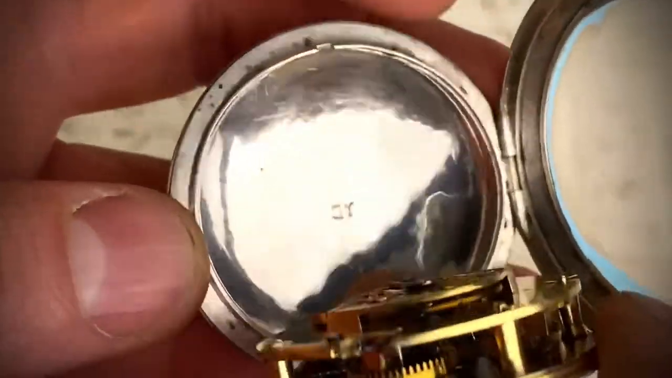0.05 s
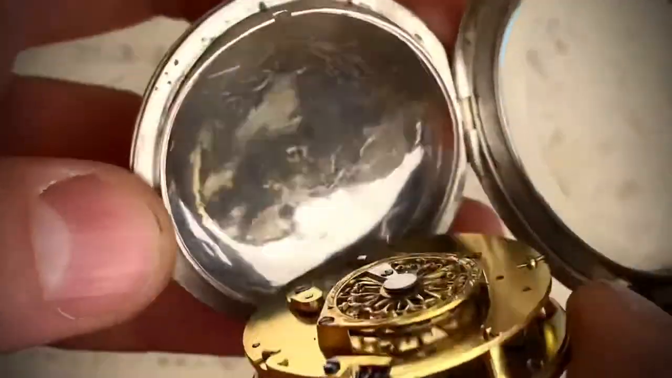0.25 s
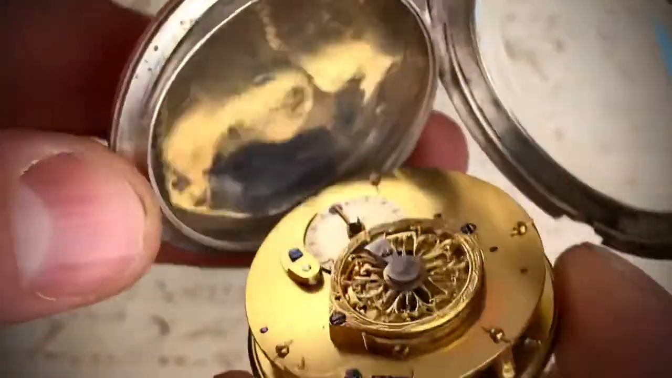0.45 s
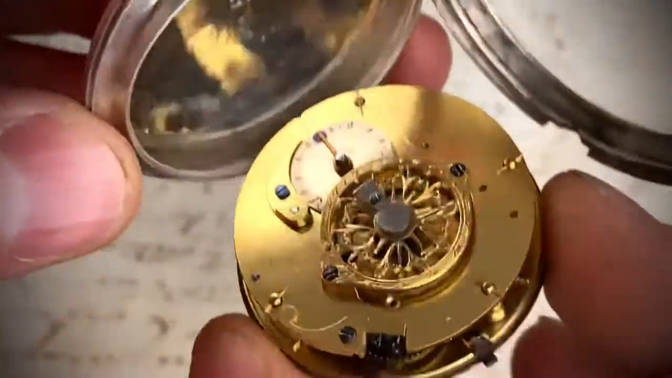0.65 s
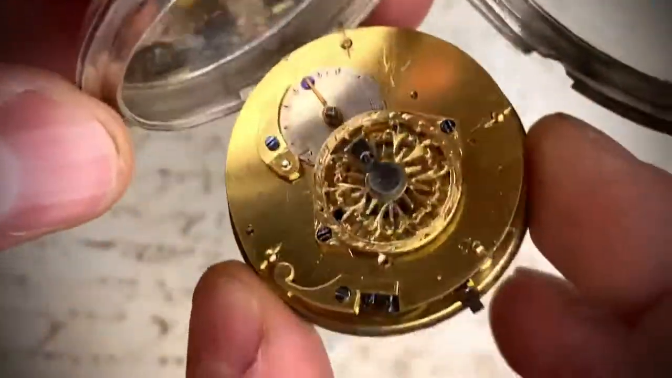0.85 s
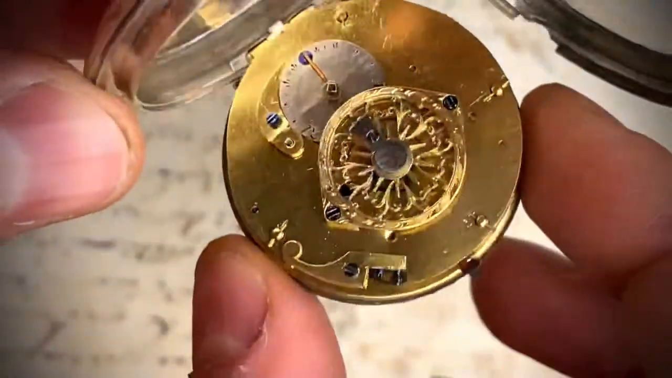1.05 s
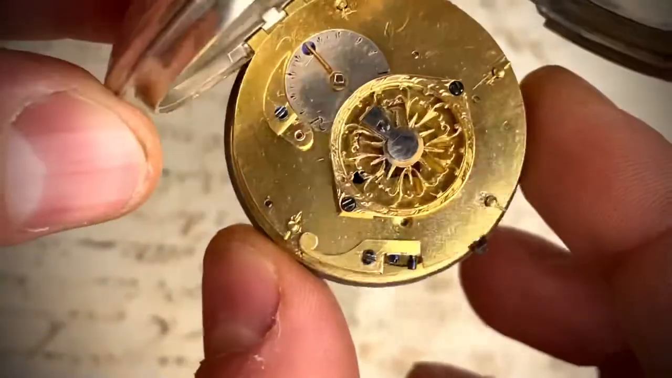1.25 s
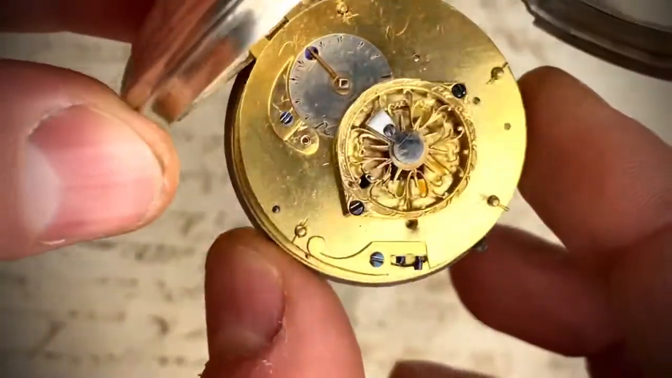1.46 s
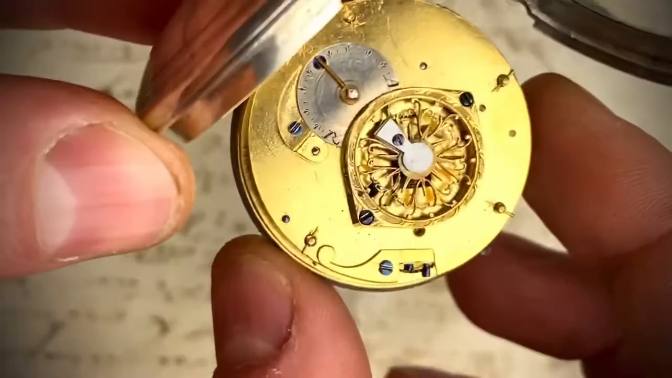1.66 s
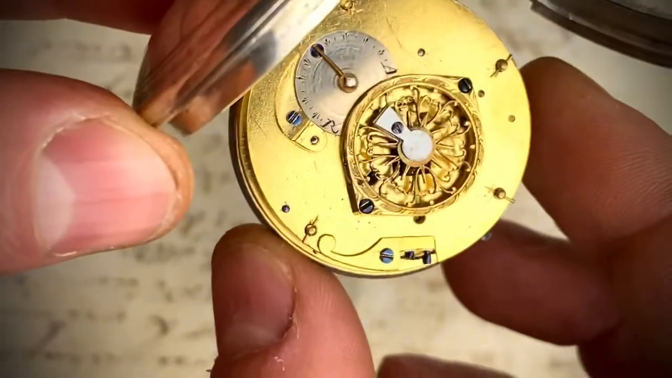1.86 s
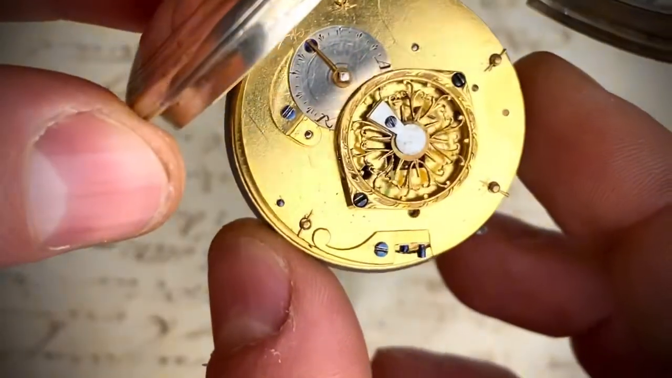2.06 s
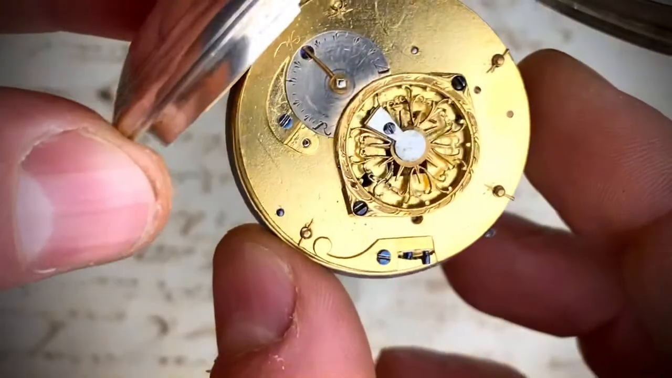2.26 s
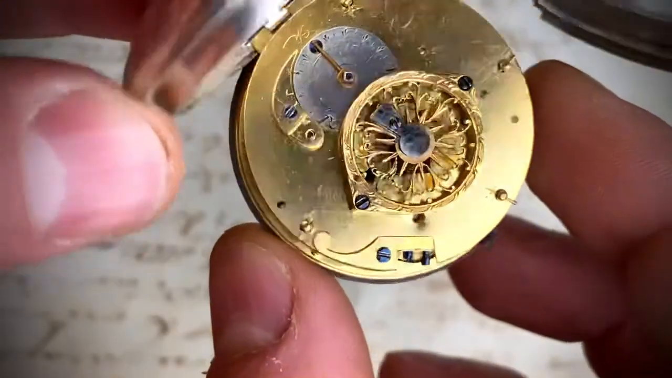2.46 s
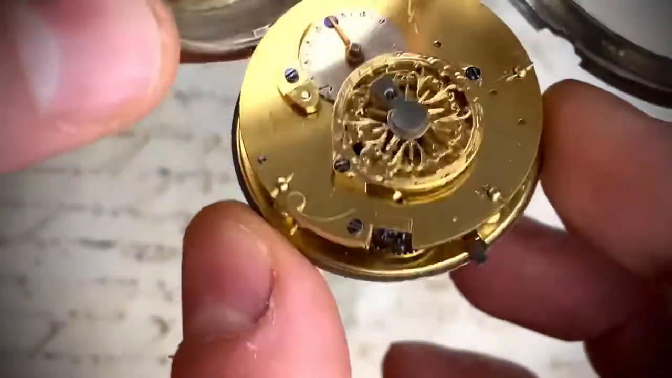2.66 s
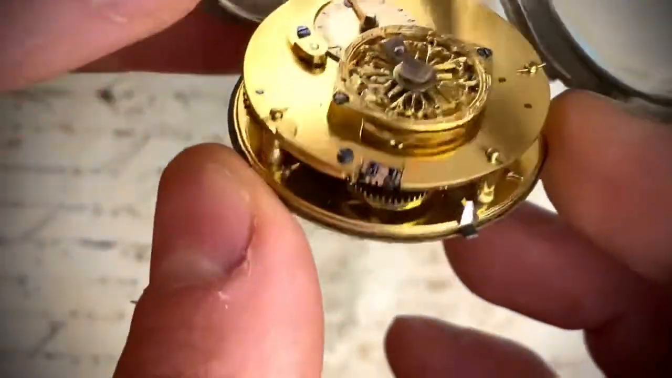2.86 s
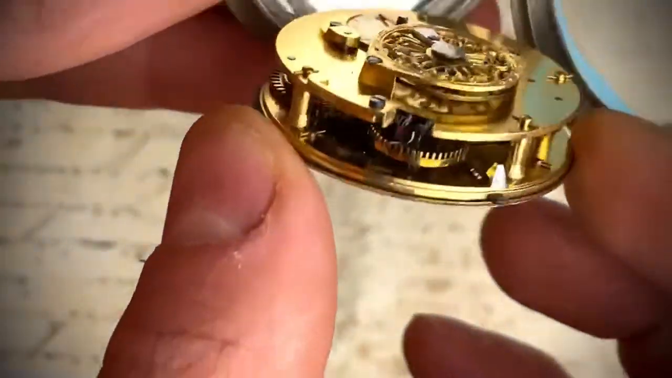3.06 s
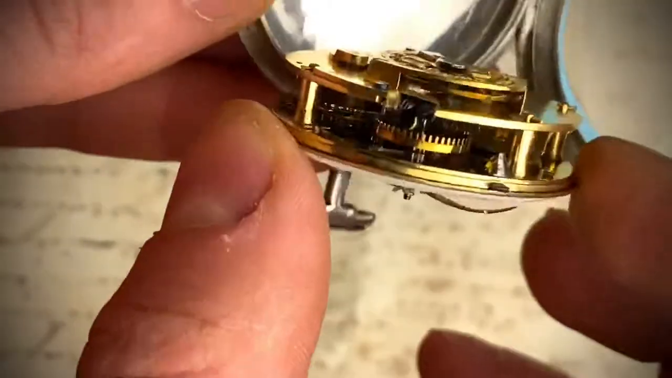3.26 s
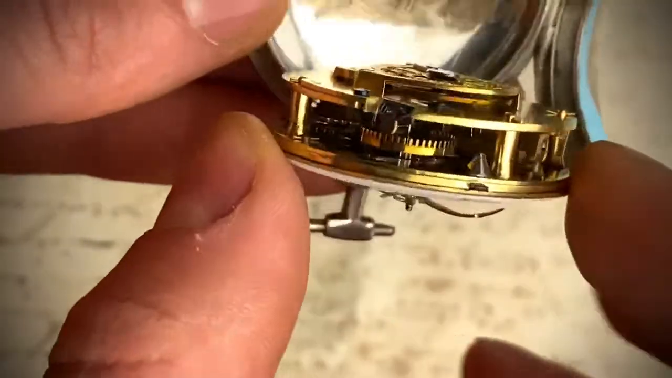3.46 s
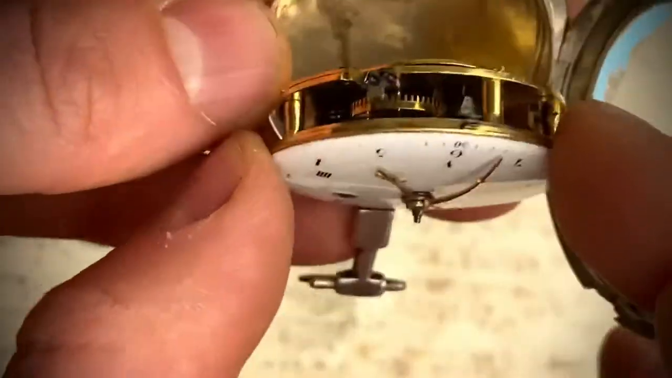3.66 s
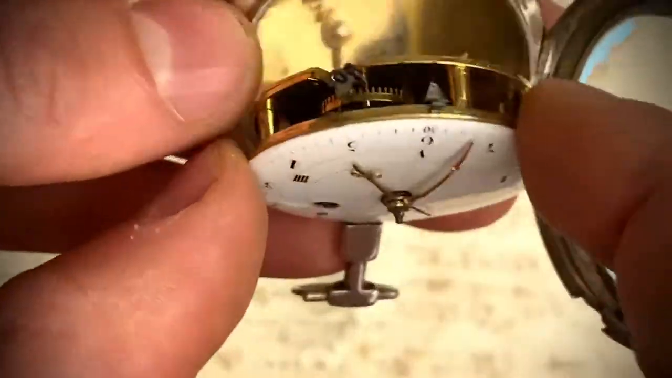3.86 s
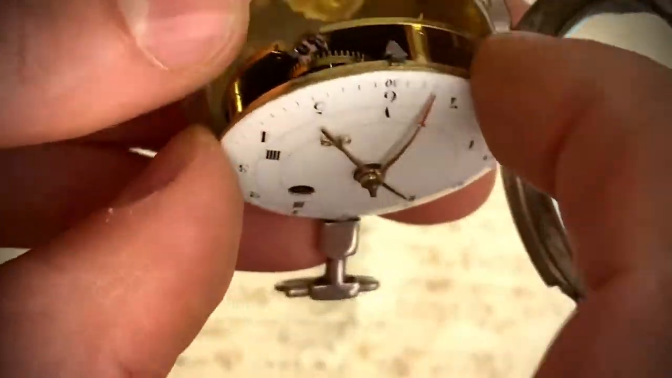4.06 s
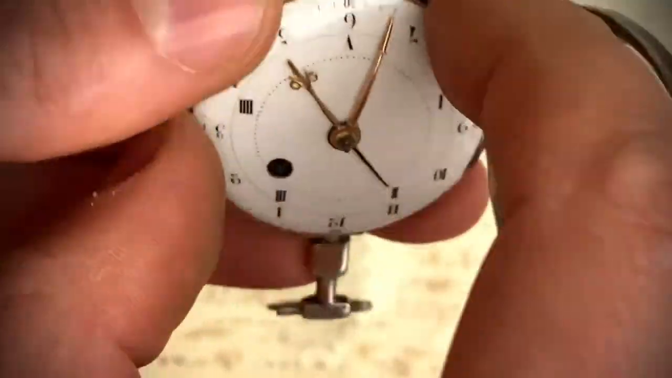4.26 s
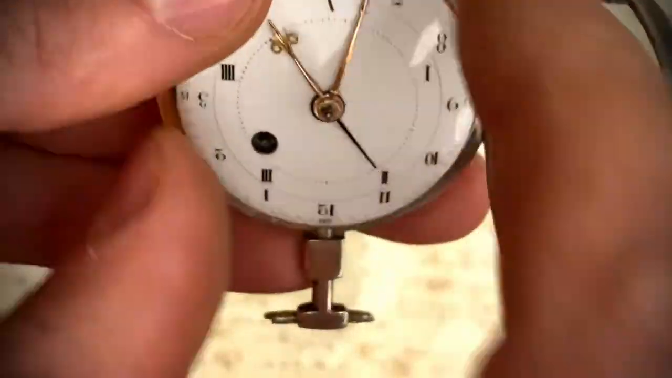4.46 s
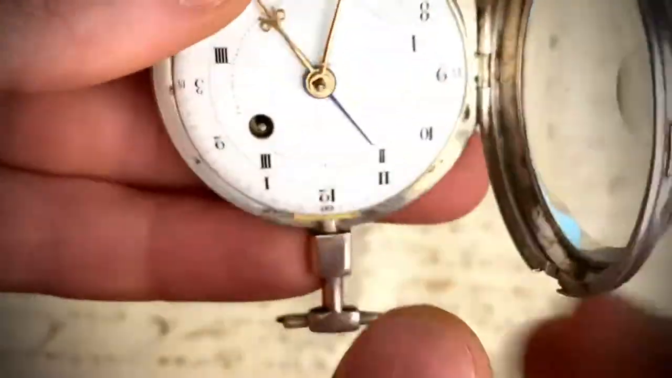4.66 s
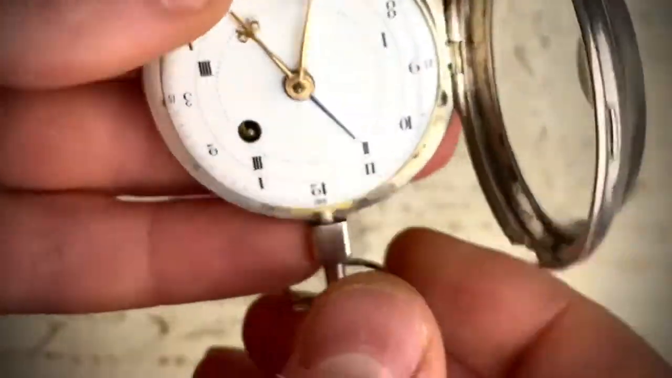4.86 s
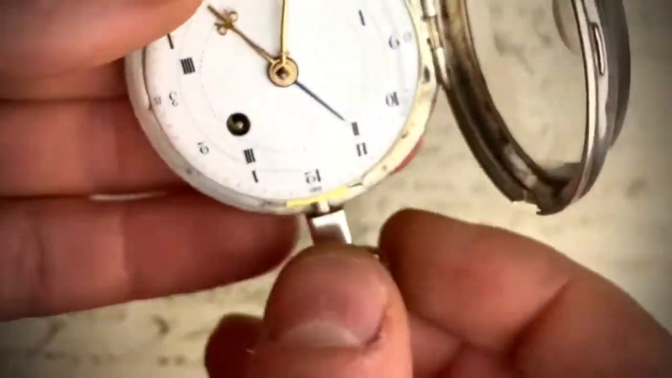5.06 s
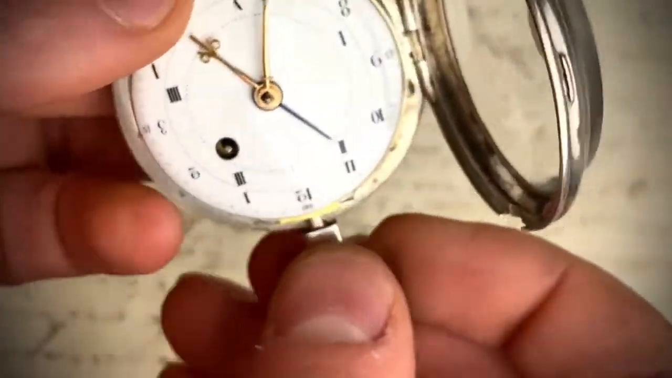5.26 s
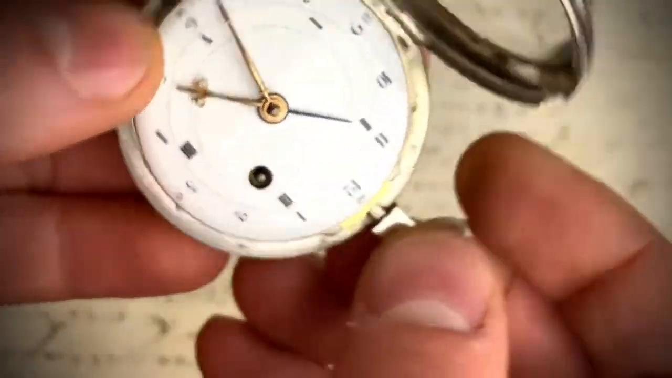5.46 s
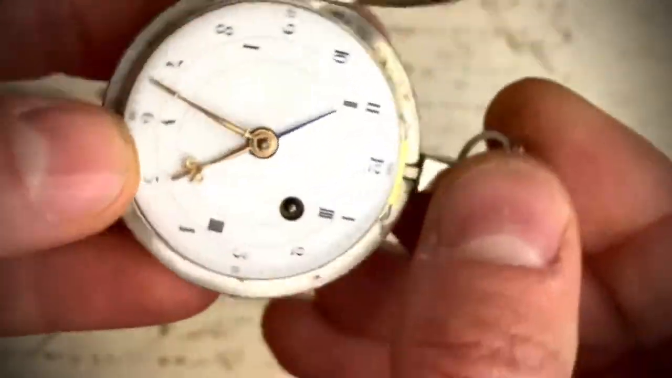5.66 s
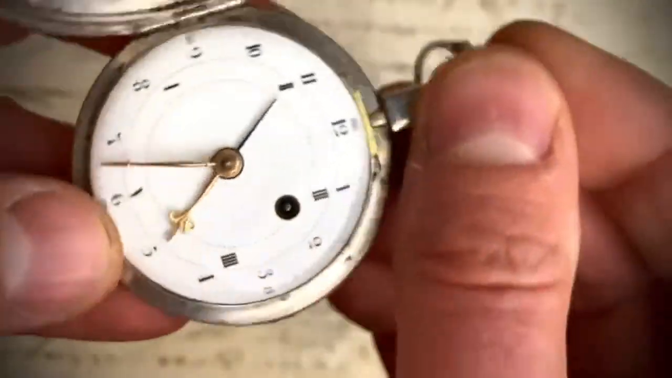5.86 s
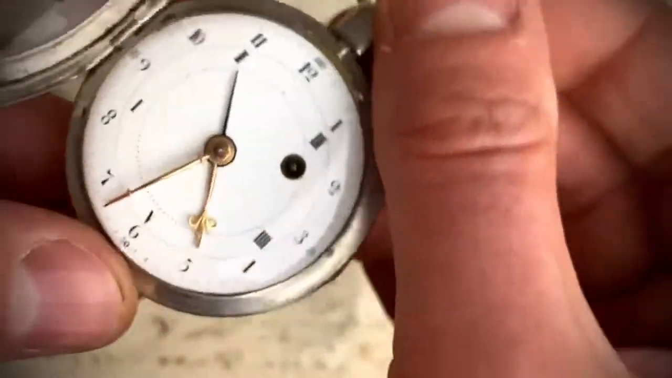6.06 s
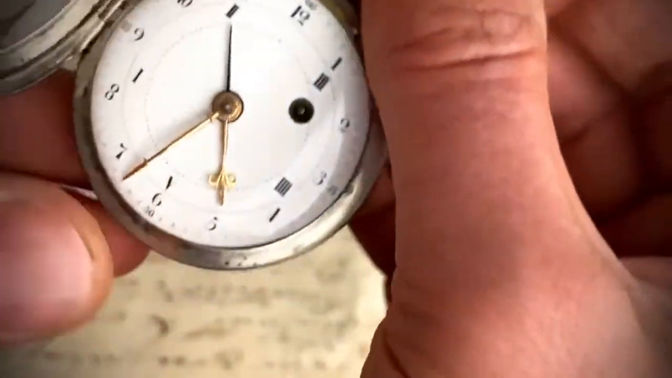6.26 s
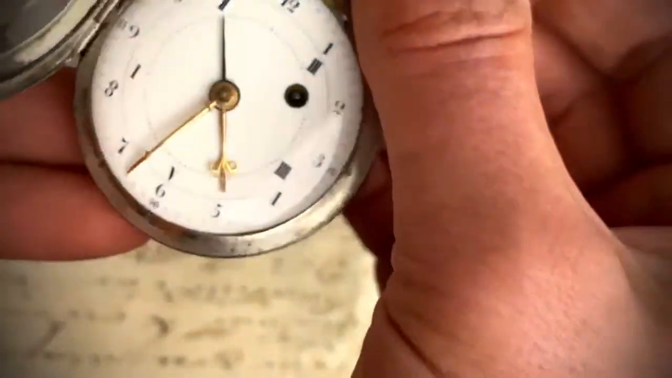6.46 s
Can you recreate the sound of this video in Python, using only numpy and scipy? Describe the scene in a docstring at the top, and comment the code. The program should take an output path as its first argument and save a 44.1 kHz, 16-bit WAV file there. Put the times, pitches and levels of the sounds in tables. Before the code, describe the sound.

Quick, even ticking from an open pocket watch held near the microphone, thin and bright. After about four seconds the works are swung into the metal case with several sharp knocks, followed by one bright snap, while fingertips slide faintly over it. The watch keeps ticking to the end. Behind it is a quiet room with soft hiss, slight electrical hum and the barely audible echo of two far clocks.

```python
"""An open pocket watch ticks in two hands, close to the microphone in a quiet room. Each beat is a short
chatter of steel on the brass plates. It starts back plate up and is tipped edge on at 2.7 s; near 4.2 s
it is swung into its silver case, which knocks and clanks and is snapped home just after 5 s, fingers
sliding on the metal. All along, two more clocks tick far off, heard only as room echo, over a wavering
mains hum and a soft hiss."""
import sys
import numpy as np
from scipy import signal
from scipy.fft import rfft, irfft, next_fast_len
from scipy.io import wavfile
from scipy.ndimage import map_coordinates

SR = 44100
rng = np.random.default_rng(int(sys.argv[2]) if len(sys.argv) > 2 else 0)


def unload_wav(signal):
    """Save mono or channel-first audio to the path in sys.argv[1] as 16-bit WAV at rate SR, clipped to [-1, 1]."""
    wavfile.write(
        sys.argv[1],
        SR,
        np.round(np.clip(np.atleast_2d(signal).T, -1, 1) * 32767).astype(np.int16),
    )


N = 287517

# beats, tick and tock in turn: (time [s], energy [dB], 3.7 kHz ping [dB], treble [dB], chatter [ms])
BEATS = [(0.1181, -17, 2, -1, 1.9), (0.3257, -20, -5.5, 6.5, 1.54), (0.5287, -18, 5.5, 2.5, 3.7),
         (0.7307, -22.5, 3, -2, 1.3), (0.9393, -14, 2, -0.5, 4.1), (1.1473, -18.2, 1, 1, 1.005),
         (1.3533, -13.5, 2, -1.5, 0.48), (1.5554, -21, -5.5, -1.5, 1.77), (1.7624, -13.5, 3.5, -0.5, 4.2),
         (1.9754, -18, -1.5, 4.5, 1.0), (2.1799, -17, -0.5, -2.5, 0.79), (2.391, -20, -1.5, -3.5, 1.9),
         (2.6015, -16, 5, 2, 2.7), (2.814, -19, 2.5, 4, 1.23), (3.0245, -16.5, -3.5, -2.5, 0.53),
         (3.2331, -18.5, -5.5, -5.5, 0.44), (3.4341, -17.5, 4, 4, 2.0), (3.6436, -19.5, 8, -0.5, 1.84),
         (3.8541, -16.2, 7, 1, 1.0), (4.0607, -18.5, 3.5, -0.5, 0.79), (4.2647, -20, 5.5, -0.3, 2.5),
         (4.4692, -18.5, -10, -6, 1.5), (4.6768, -19, 5, 0, 1.4), (4.8753, -20.5, -3.5, -2, 1.1),
         (5.0814, -20, -2, 6, 1.9), (5.2789, -22, -1, -2, 0.57), (5.4774, -18.6, 1.5, 2, 1.08),
         (5.6775, -22.5, 7.5, 0.5, 1.8), (5.8731, -21, 2.5, 5, 0.7), (6.0551, -23.0, 1, 5, 1.5),
         (6.2547, -17.5, 2.1, -5, 2.38), (6.4497, -21.5, 9.5, -2, 0.82)]
# modes of the brass movement: (frequency [Hz], tick level [dB], tock level [dB], t60 [s])
BRASS_MODES = [(1710, 0, -2.5, 0.0067), (2430, 3, -2.5, 0.013), (3457, 4, 1.5, 0.0088),
               (3730, -21.5, -14.5, 0.078), (4460, -5, -9, 0.0061), (4995, 1, 3.5, .012),
               (5870, -26, -25.5, .09), (5930, 5.5, 0, 0.0092), (7005, -3, -9, 0.0078),
               (8134, 1.5, 4.5, 0.012), (8680, -16, -22.5, 0.067), (9800, -2, -0.5, 0.015),
               (10170, -21.5, -16.5, 0.078), (11300, -10.5, -7, 0.0043), (12500, 6, -2, 0.0071),
               (13100, -22, -14.5, .05), (13700, 1, -1, .012), (14200, -3, -2.5, 0.0077),
               (15300, -3, -1.5, .01)]
# bands in which a beat or knock is coloured: (frequency [Hz])
BANDS_HZ = [2000, 3700, 5000, 6000, 10000, 14000]
# colour at the microphone; rows back plate up, edge on, in the case: (level per band [dB re 8 kHz])
TICK_POSES = [(-25.5, -12.5, -3.5, 3.1, -6, -12), (-19.5, -12.5, -4.5, 5.7, -7.5, -11),
              (-13, -1, -10.5, 9.8, -6.5, -8.5)]
TOCK_POSES = [(-33, 2.5, -0.5, 2.1, -5, -3), (-15, -12.5, -1, 0.84, -7.5, -5.5),
              (-0.5, 2, -2.5, 10, 0.5, -4.5)]
EDGE_ON_S, IN_CASE_S = 2.7, 4.2
# first touch, main blow and rebound of one chatter: (relative strength [gain])
CONTACTS = np.array([.5, 1, .6])
# the case knocked, hinged and shut: (time [s], energy [dB], thud [dB], clank [dB], treble [dB], chatter [ms])
KNOCKS = [(0.6064, -40.5, 11, 0, 8, 3.1), (0.615, -44, -1, -2, 5, 4.2), (4.1583, -2.5, -5, 8, -1.5, 0.98),
          (4.1615, -3.5, 4, 6, 13, 0.41), (4.165, -16.5, 1, 8, 6, 1.3),
          (4.214, -1.5, -10.5, -8.5, 0.1, 1.26), (4.4829, 0, -30, -5, -2, 0.75),
          (4.4866, 9, -21, -14, -3.5, 0.53), (4.4885, 9, -2.5, 8.5, -1.7, 0.8),
          (4.584, -22, -21, 17.5, -3, 1.9), (4.7449, -14.5, -27.5, 9, -1, 1.3),
          (4.7486, -18, -22, 10.5, -1, 2.54), (4.7746, -31, -10, 17, -4, 2.5),
          (4.786, -12, -33.5, -5, 1, 1.38), (4.7938, -13, -24, 17.5, 0, 1.4),
          (5.0676, 1.05, -23, 5, 20, 0.59)]
# modes of the silver case: (frequency [Hz], level [dB], t60 [s])
SILVER_MODES = [(1173, -1.5, 0.014), (880, -5, 0.016), (1750, 3, 0.03), (1822, -1, 0.034),
                (2050, -7.5, 0.023), (2279, -3, 0.008), (2657, -8, 0.012), (3597, -9.5, 0.027),
                (4960, 0.5, .012), (5250, -1, 0.022), (5500, 0.5, 0.019), (6280, -5, .025),
                (7786, -4, 0.024), (8330, -6.5, 0.022), (8830, -8, .035), (9520, -10.5, .025),
                (10430, 0, 0.018), (10900, -6, 0.014), (11850, -3, 0.019), (13040, 2, 0.017),
                (13100, -2.5, 0.014), (14100, -3, 0.02), (14750, -4, .02), (16290, -5.5, .015)]
# colour common to all knocks: (level per band [dB re 8 kHz])
KNOCK_COLOUR = np.array([-1, 1.0, -7.5, -0.5, -0.5, 0.54])
# how much of a knock's clank and treble reaches each band: (share [ratio])
CLANK_SHARE = np.array([0.97, 0.66, 0.84, 0, 0, 0.11])
TREBLE_SHARE = np.array([0, 0.18, 0.011, 0.036, 0.95, .7])
# finger slides: (start [s], length [s], level [dB])
RUBS = [(.245, .015, -79), (3.76, .11, -74), (4.447, 0.04, -62), (4.972, 0.13, -69.5), (5.233, 0.019, -73),
        (5.253, 0.022, -70.5), (5.3, 0.14, -71), (5.58, .1, -76)]
# resonances of skin on metal and of the two far clocks: (frequency [Hz], half-width [Hz], level [dB])
SKIN_PEAKS = [(8400, 1500, -3), (11000, 2800, -5.5), (13800, 1500, 3.5)]
DULL_CLOCK_PEAKS = [(3610, 210, -6), (5100, 160, 2.5), (5350, 400, -5.5), (5800, 220, -2),
                    (7160, 230, -8.5)]
BRIGHT_CLOCK_PEAKS = [(8600, 1000, -10.5), (9710, 1100, 4), (10600, 900, -5.5), (12900, 550, 4),
                      (13600, 1400, -1.5), (15400, 400, -8.5)]
# close scatter off hands, lids and table, then the room's echo: (frequency [Hz], t60 [s])
NEAR_DECAY = [(1000, 0.086), (6000, 0.03), (14000, 0.048)]
ROOM_DECAY = [(300, 0.27), (2000, 0.33), (6000, 0.35), (14000, .22)]
# low mains hum and a thin whine: (frequency [Hz], half-width [Hz], level [dB])
HUM_PEAKS = [(97, 6.6, -76.5), (2210, 90, -86)]
# course of the hum's second partial: (time [s], level [dB])
BUZZ_LEVELS = [(0.0, -78), (1.0, -85.5), (1.3, -73), (2.8, -81), (3.3, -89.5), (6.52, -90.5)]
# hiss of room and microphone: (frequency [Hz], relative density [dB])
HISS_SPECTRUM = [(15, -43), (30, -29), (65, -5), (150, -4.5), (438, -8), (700, -13), (1700, -19),
                 (4500, -22.5), (7000, -25), (14000, -28.5), (15800, -28.5), (16100, -54.5)]
# microphone response: (frequency [Hz], gain [dB])
MIC_RESPONSE = [(40, -3), (70, -1), (15400, 0.5), (16000, -14.5), (16800, -35.5)]


def escapement():
    """The watch, close up: two pallets take turns and ring the same plates at different strengths."""
    tick = [(hz, db, t60) for hz, db, _, t60 in BRASS_MODES]
    tock = [(hz, db, t60) for hz, _, db, t60 in BRASS_MODES]
    pallets = [(BEATS[::2], TICK_POSES, tick), (BEATS[1::2], TOCK_POSES, tock)]
    return sum(struck_metal(posed(beats, poses), modes, BANDS_HZ, low_db=-13, crack_db=12,
                            crack_t60=0.0077, blur=0.084, near_db=-10, room_db=-25)
               for beats, poses, modes in pallets)


def posed(beats, poses):
    """Beats coloured by how the watch faces the microphone; no two leave the hands alike."""
    scatter_db = rng.normal(0, 0.5, (len(beats), len(BANDS_HZ)))
    events = []
    for (s, db, ping, treble, ms), scatter in zip(beats, scatter_db):
        pose = poses[int(s > EDGE_ON_S) + int(s > IN_CASE_S)]
        colour = pose + scatter + [0, ping, 0, 0, treble, treble]
        events.append((s, db, *colour, ms))
    return events


def silver_case(thud_hz=950):
    """The case, just as close: each knock rings the silver with its own thud, clank and treble."""
    events = [(s, db, thud, *(KNOCK_COLOUR + clank * CLANK_SHARE + treble * TREBLE_SHARE), ms)
              for s, db, thud, clank, treble, ms in KNOCKS]
    return struck_metal(events, SILVER_MODES, [thud_hz] + BANDS_HZ, low_db=-28.5, crack_db=13.5,
                        crack_t60=0.0092, blur=0.061, near_db=-13.5, room_db=-18.5)


def struck_metal(events, modes, bands_hz, low_db, crack_db, crack_t60, blur, near_db, room_db):
    """Small impacts ring the modes with a dry crack; near scatter and the room's echo follow."""
    out, t = np.zeros(N + SR), np.arange(SR // 6) / SR
    hz, level_db, t60 = np.transpose(modes)[:, :, None]
    attack = 1 - np.exp(-t / 0.00064)
    for s, db, *band_db, chatter_ms in events:
        colour = sorted([(bands_hz[0] / 2, band_db[0] + low_db), (8000, 0), *zip(bands_hz, band_db)])
        # fingers and loose parts make the phase of every mode wander
        phase = 2 * np.pi * rng.random(hz.shape)
        phase = phase + blur * np.cumsum(rng.standard_normal((len(hz), len(t))), axis=1)
        strength = amp(level_db + along(colour, hz) + rng.normal(0, 1.8, hz.shape))
        life = t60 * (.7 if s > IN_CASE_S else 1)  # the case damps the ringing
        ring = np.sum(strength * amp(-60 * t / life) * np.sin(2 * np.pi * hz * t + phase), axis=0)
        crack = filtered(rng.standard_normal(len(t)), lambda f: amp(crack_db + along(colour, f)))
        crack *= amp(-60 * t / crack_t60)
        blow = signal.fftconvolve((ring + crack) * attack, chatter(chatter_ms))
        blow = amp(db) * blow / np.linalg.norm(blow)
        near = amp(near_db) * signal.fftconvolve(blow, diffuse_tail(NEAR_DECAY, .1, delay_s=0.0011))
        echo = amp(room_db) * signal.fftconvolve(blow, diffuse_tail(ROOM_DECAY, .3, delay_s=0.0076))
        for part in blow, near, echo:
            out[round(s * SR):][:len(part)] += part
    # so small a thing radiates little below 220 Hz
    return filtered(out[:N], lambda f: (1j * f / (220 + 1j * f)) ** 2)


def chatter(span_ms):
    """A light first touch, the blow itself, then a rebound, in roughly span_ms."""
    impacts, count = np.zeros(SR // 50), len(CONTACTS)
    times = span_ms / 1000 * (np.arange(count) + .4 * rng.random(count)) ** 1.5 / count
    impacts[(times * SR).astype(int)] = rng.choice([-1, 1], count) * CONTACTS
    return impacts


def fingers():
    """Skin slides on polished metal by the microphone: short bright rubs that swell and fade."""
    t = np.arange(N) / SR
    swell = sum(amp(db) * np.sin(np.pi * np.clip((t - s) / length, 0, 1)) ** .7
                for s, length, db in RUBS)
    return swell * resonant_noise(SKIN_PEAKS)


def dull_clock(first_s=.339, period_s=.4186):
    """Far off in the room, a steady dull tick with a faint tock halfway between."""
    beats = [(s, db) for shift, db in [(-1, -66), (-.5, -81)]
             for s in np.arange(first_s + shift * period_s, N / SR, period_s)]
    return far_ticking(beats, DULL_CLOCK_PEAKS, rise_s=0.0061, t60=0.36)


def bright_clock(first_s=.313, period_s=.4012):
    """A brighter far clock, a little uneven in time and level."""
    times = np.arange(first_s, N / SR, period_s)
    beats = [(rng.normal(s, .003), rng.normal(-60, 2)) for s in times]
    return far_ticking(beats, BRIGHT_CLOCK_PEAKS, rise_s=0.011, t60=0.26)


def far_ticking(beats, peaks, rise_s, t60):
    """At this distance each beat (time [s], level [dB]) arrives as a swell of room echo."""
    t, power = np.arange(N) / SR, np.zeros(N)
    for s, db in beats:
        since = np.maximum(t - s, 0)
        swell = amp(db - 60 * since / t60) * (1 - np.exp(-since / rise_s)) ** 2
        power += swell ** 2
    return np.sqrt(power) * resonant_noise(peaks)


def room_tone(waver_db=3.5, wavers_per_s=6):
    """Hiss of room and microphone, with a mains hum whose second partial wavers."""
    t = np.arange(N) / SR
    hiss = amp(-68.5) * unit(filtered(rng.standard_normal(N), lambda f: amp(along(HISS_SPECTRUM, f))))
    hum = sum(amp(db) * resonant_noise([(hz, width, 0)]) for hz, width, db in HUM_PEAKS)
    waver = map_coordinates(rng.standard_normal(100), [t * wavers_per_s], mode="wrap")
    buzz_db = np.interp(t, *np.transpose(BUZZ_LEVELS)) + waver_db * waver
    return hiss + hum + amp(buzz_db) * resonant_noise([(198.2, 7.1, 0)])


def diffuse_tail(decays, seconds, delay_s):
    """Dense reflections of energy 1; each frequency dies at its own speed."""
    hz, t, spectra = signal.stft(rng.standard_normal(int(seconds * SR)), SR, nperseg=128)
    tail = signal.istft(spectra * amp(-60 * t / along(decays, hz)[:, None]), SR, nperseg=128)[1]
    return np.pad(tail / np.linalg.norm(tail), (int(delay_s * SR), 0))


def resonant_noise(peaks):
    """Noise through resonant peaks, scaled to rms 1."""
    shape = lambda f: sum(amp(db) / (1 + ((f - hz) / width) ** 2) for hz, width, db in peaks)
    return unit(filtered(rng.standard_normal(N), shape))


def filtered(x, response):
    """x through a complex response of frequency."""
    size = next_fast_len(len(x) + 8192)
    return irfft(rfft(x, size) * response(np.fft.rfftfreq(size, 1 / SR)), size)[:len(x)]


def along(points, hz):
    """(frequency [Hz], value) points read on a log axis."""
    freqs, values = np.transpose(points)
    return np.interp(np.log(hz + 1), np.log(freqs + 1), values)


def amp(db):
    """Decibels to gain."""
    return 10 ** (np.asarray(db) / 20)


def unit(x):
    """Scaled to rms 1."""
    return x / np.sqrt(np.mean(x ** 2) + 1e-20)


def scene():
    """Watch, case and fingers in front; two clocks and the room tone behind."""
    return (escapement() + silver_case() + fingers() + dull_clock() + bright_clock() + room_tone())[None]


def record(dry):
    """One microphone, rolling off at both ends, with nothing above 16.9 kHz."""
    return filtered(dry[0], lambda hz: amp(along(MIC_RESPONSE, hz)) * (hz < 16900))[None]


dry = scene()
out = record(dry)
unload_wav(out)
```